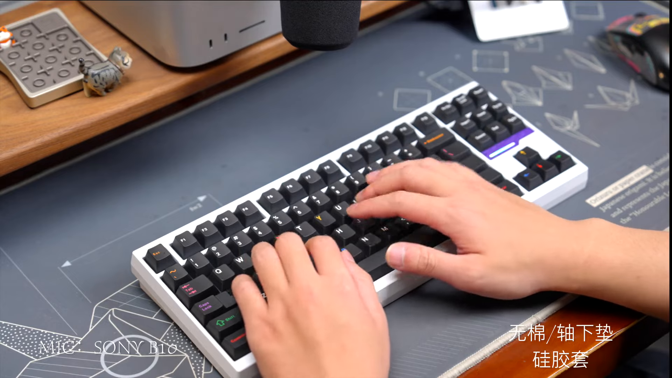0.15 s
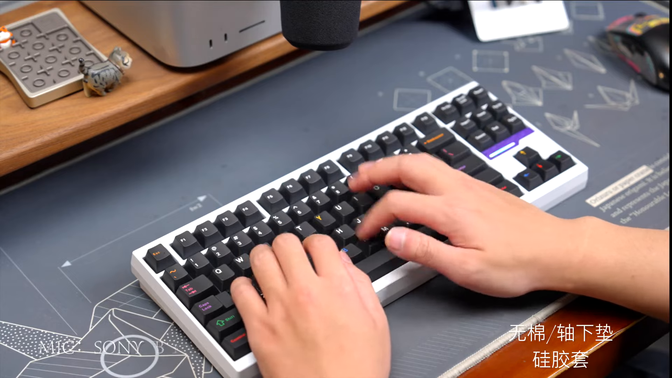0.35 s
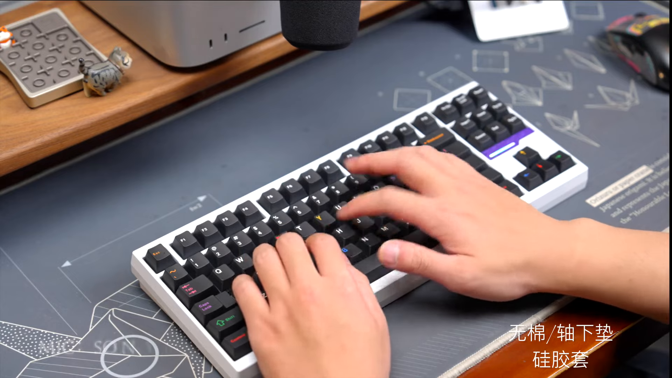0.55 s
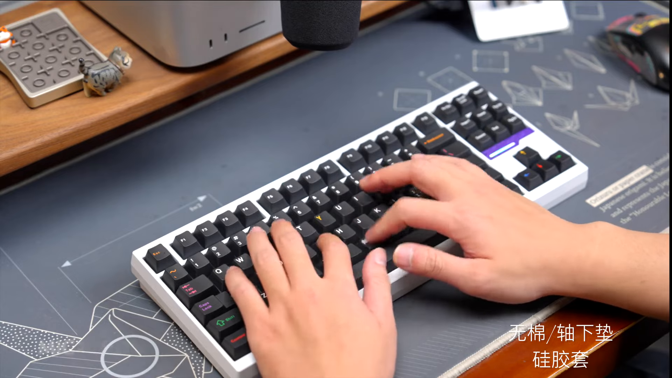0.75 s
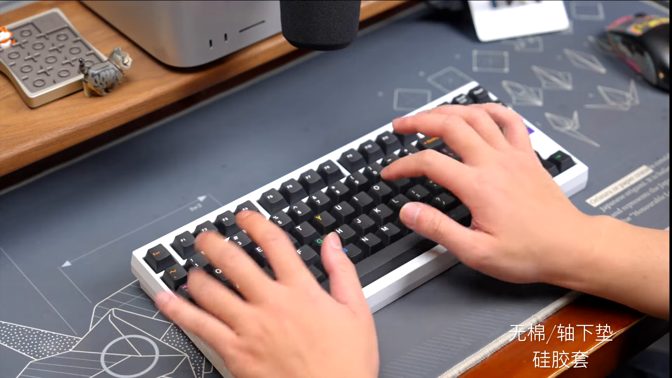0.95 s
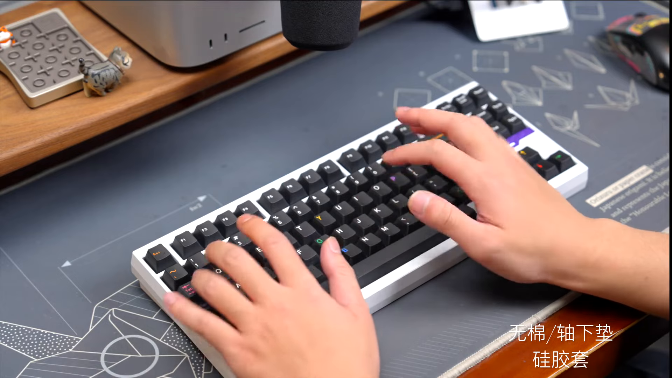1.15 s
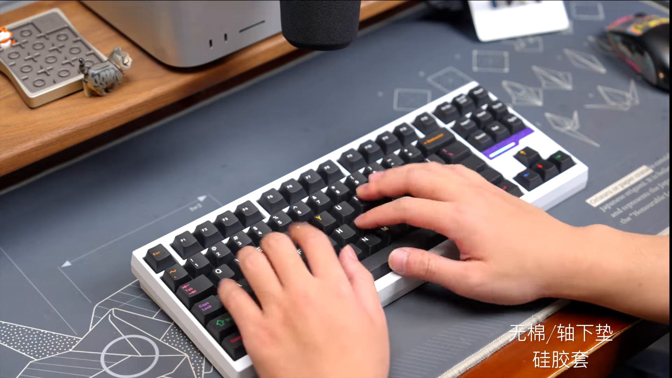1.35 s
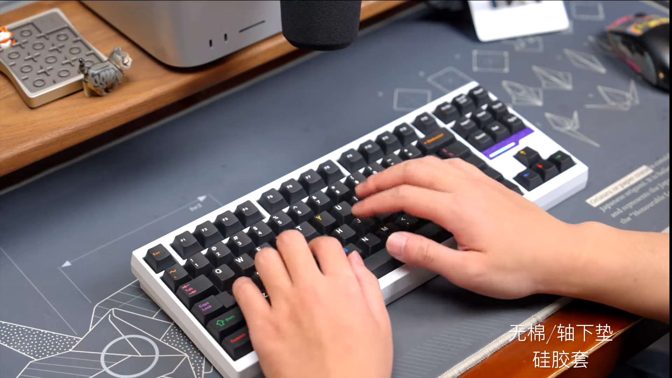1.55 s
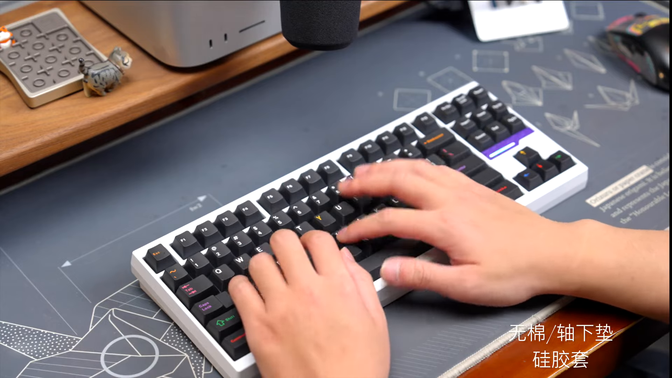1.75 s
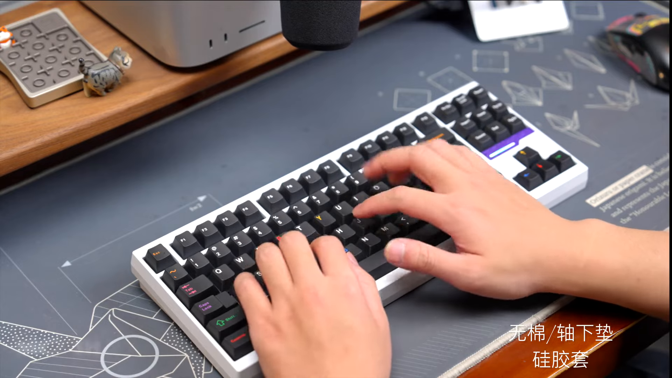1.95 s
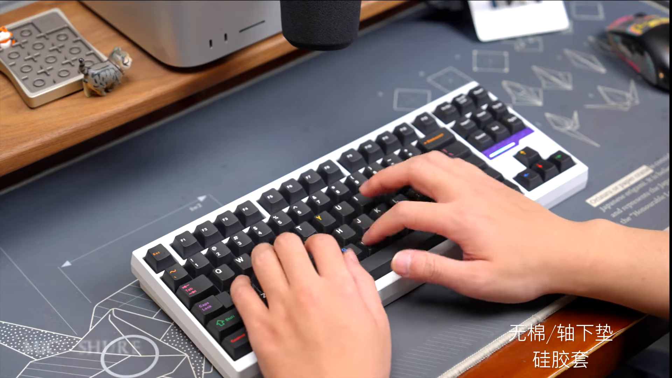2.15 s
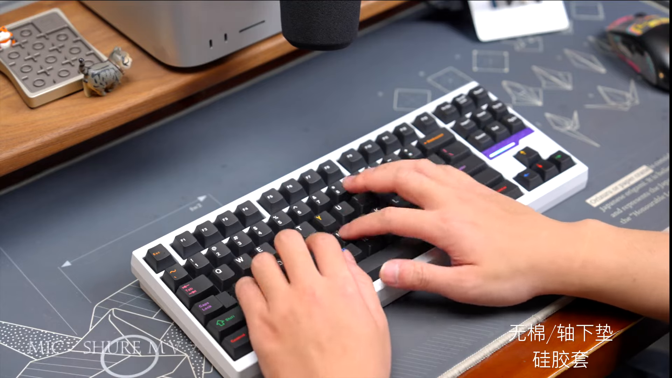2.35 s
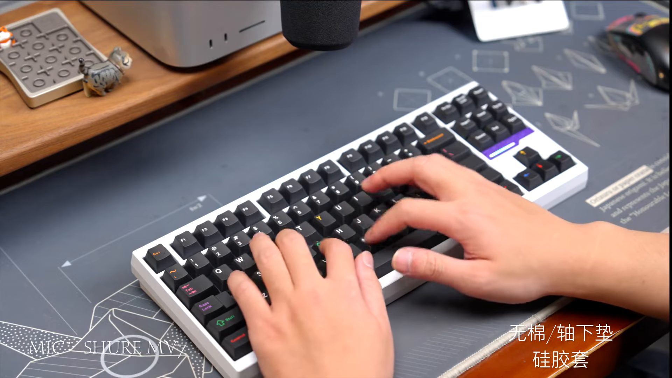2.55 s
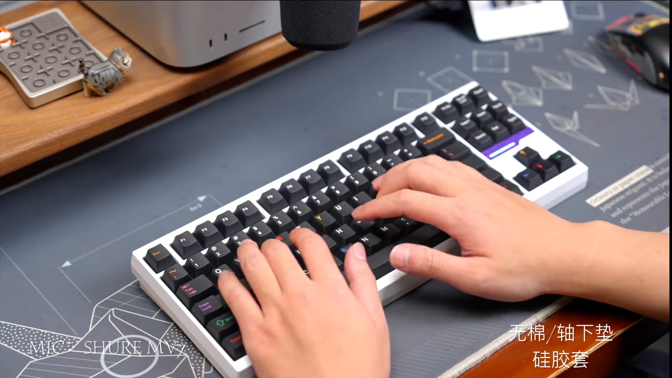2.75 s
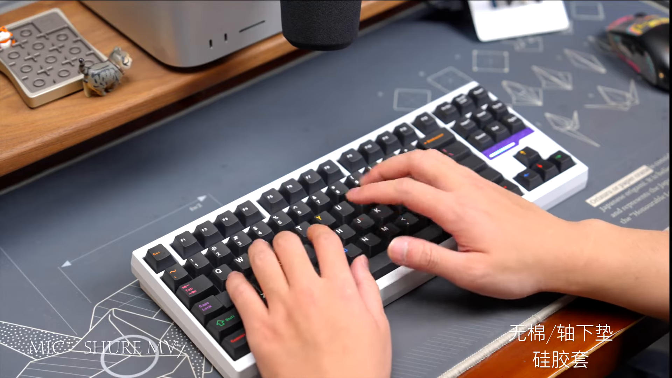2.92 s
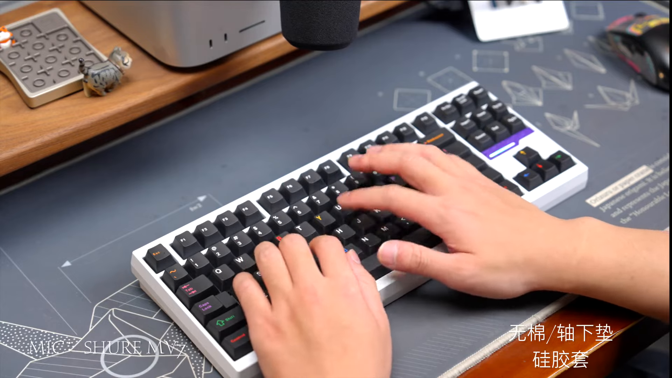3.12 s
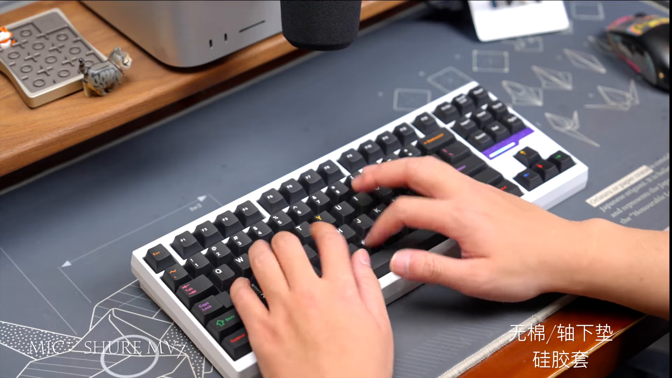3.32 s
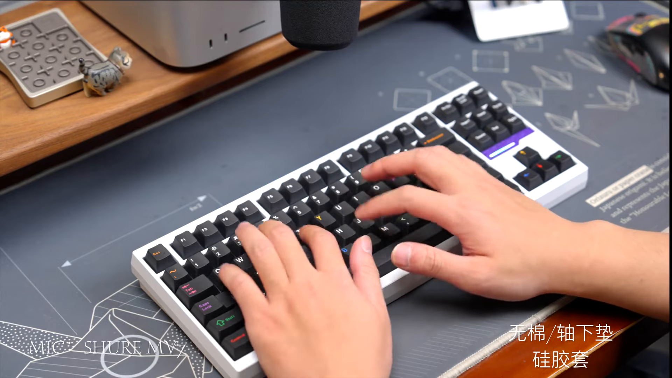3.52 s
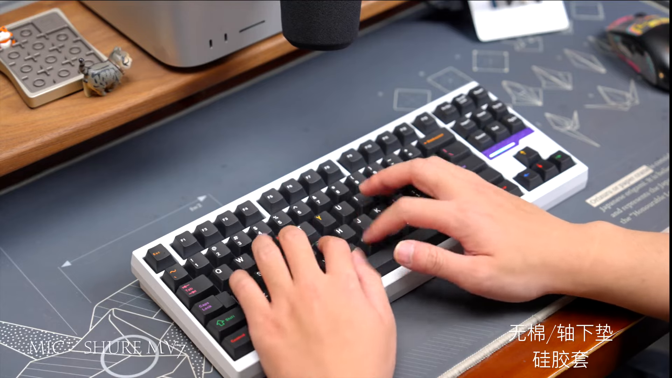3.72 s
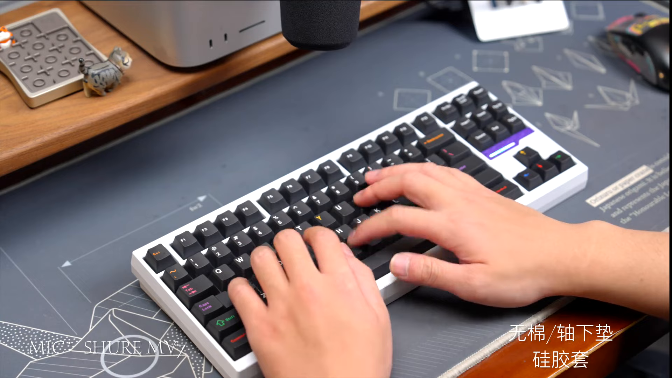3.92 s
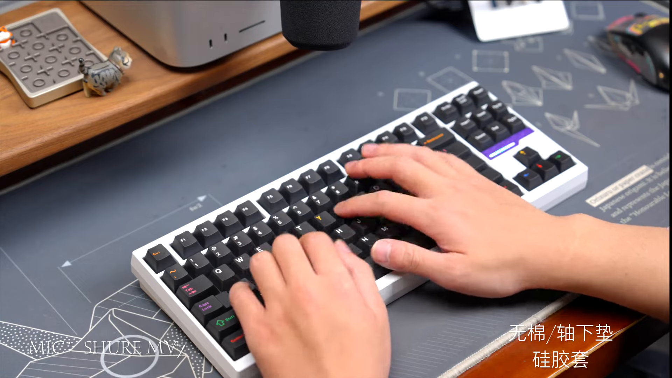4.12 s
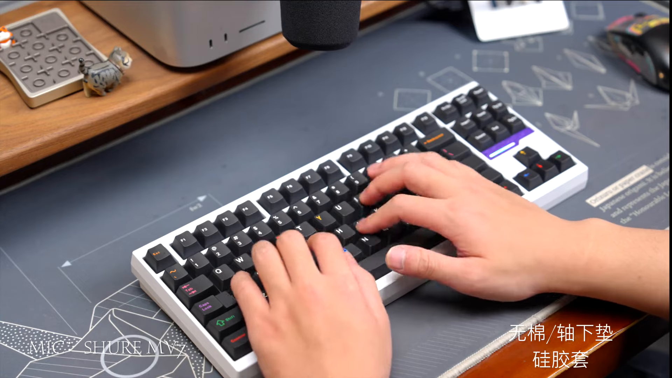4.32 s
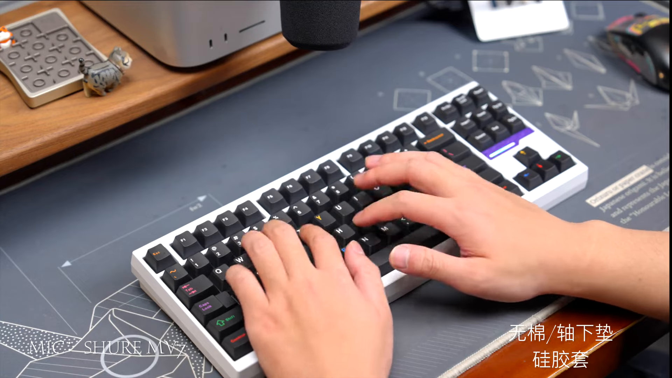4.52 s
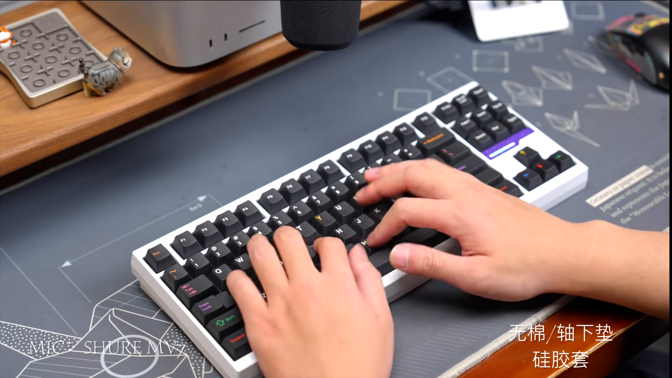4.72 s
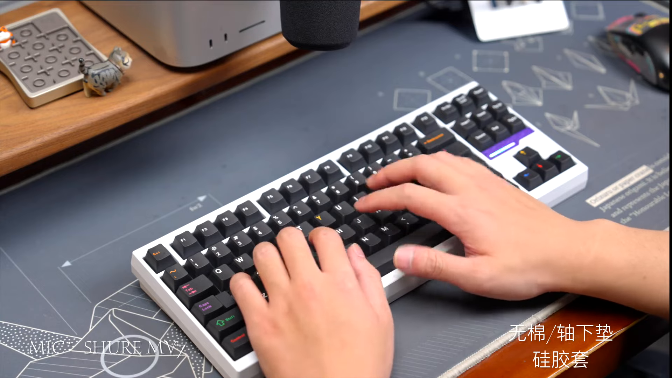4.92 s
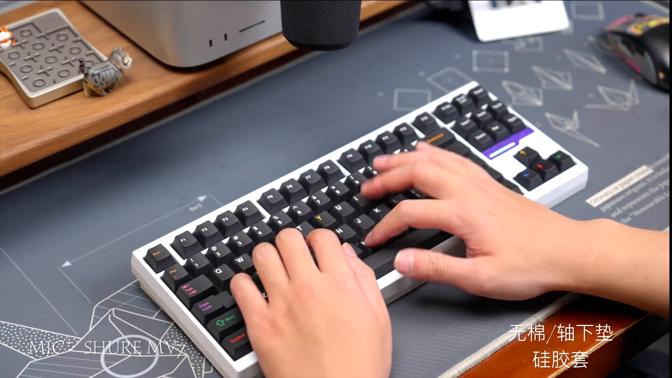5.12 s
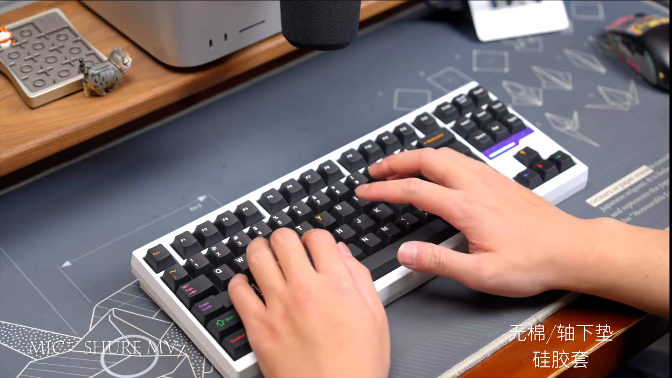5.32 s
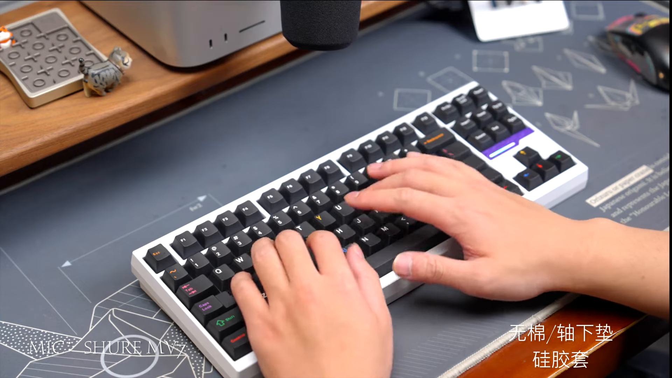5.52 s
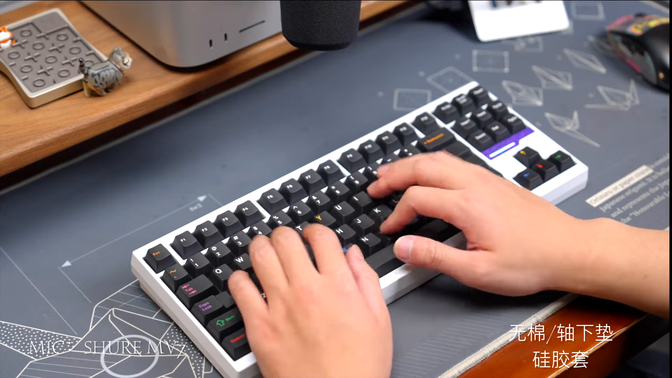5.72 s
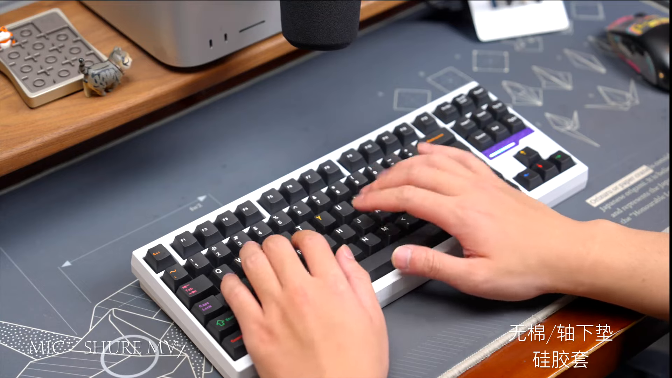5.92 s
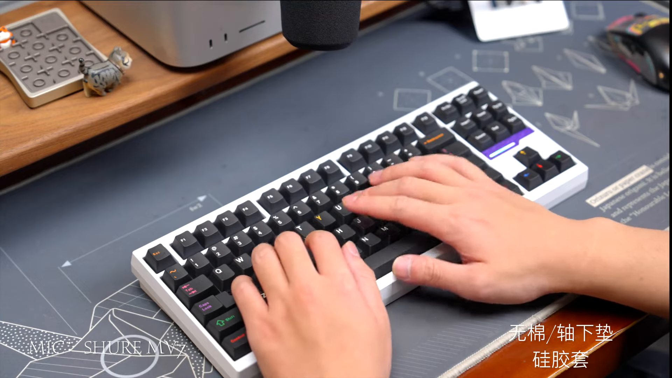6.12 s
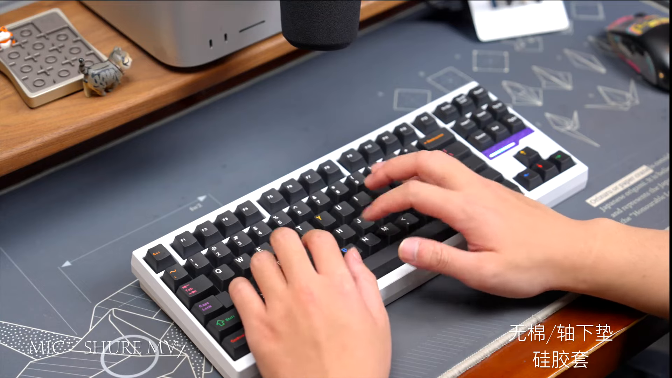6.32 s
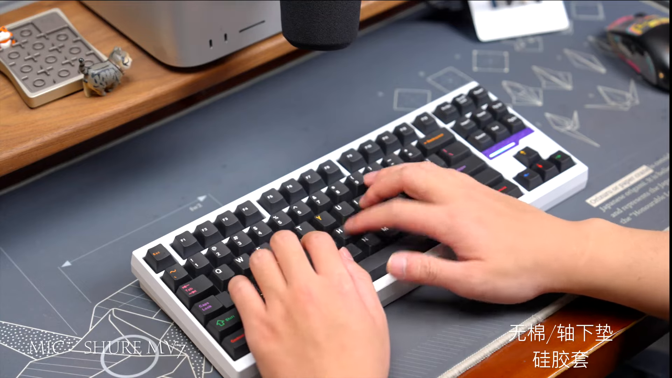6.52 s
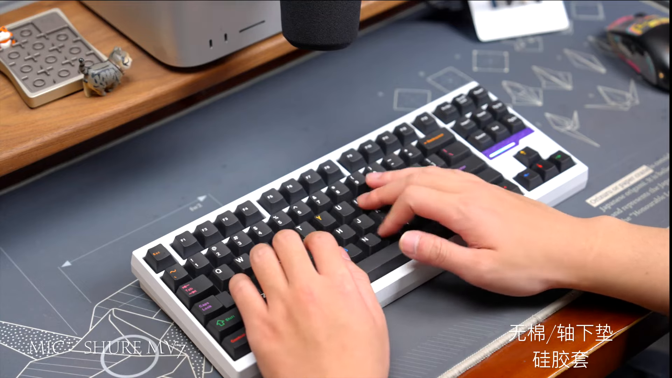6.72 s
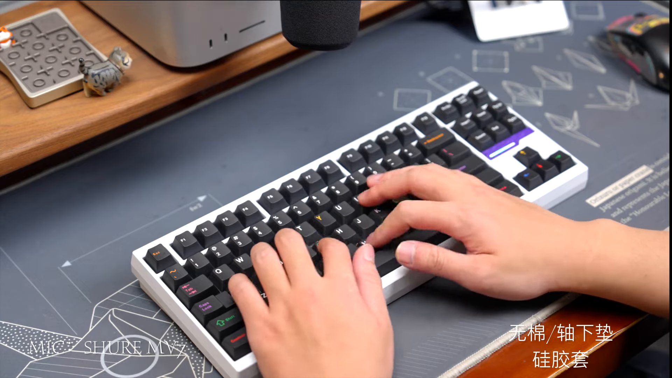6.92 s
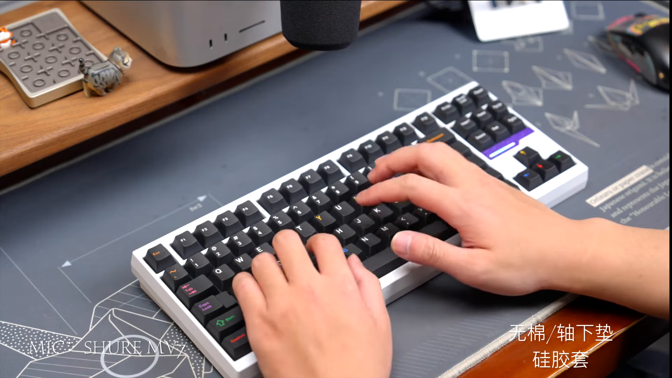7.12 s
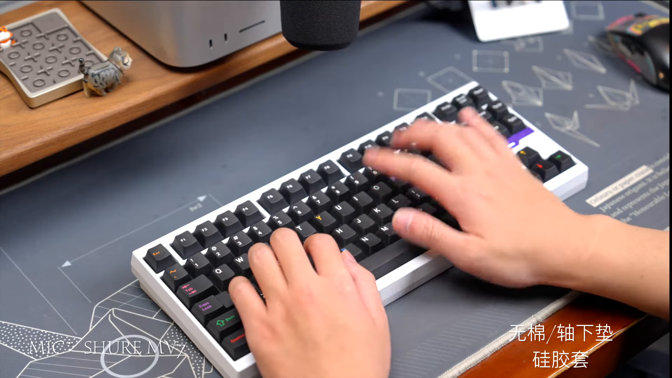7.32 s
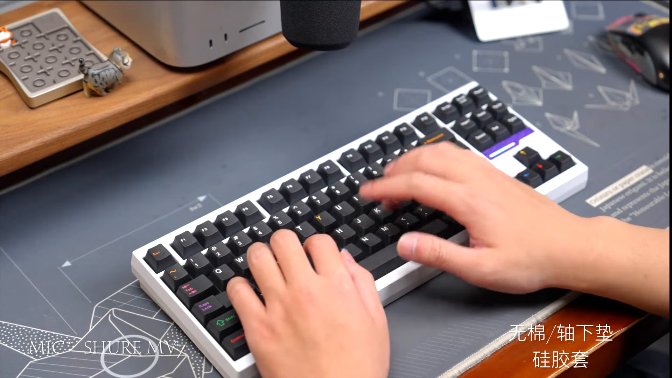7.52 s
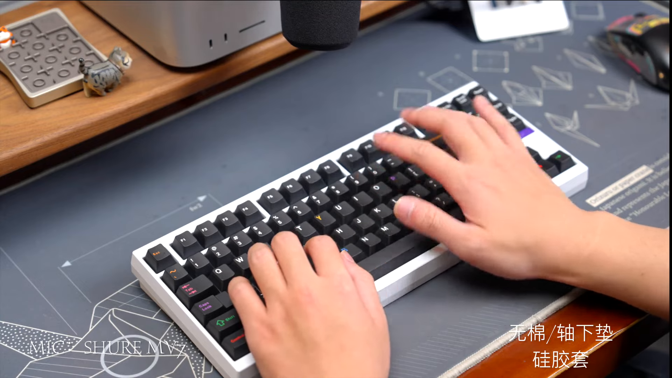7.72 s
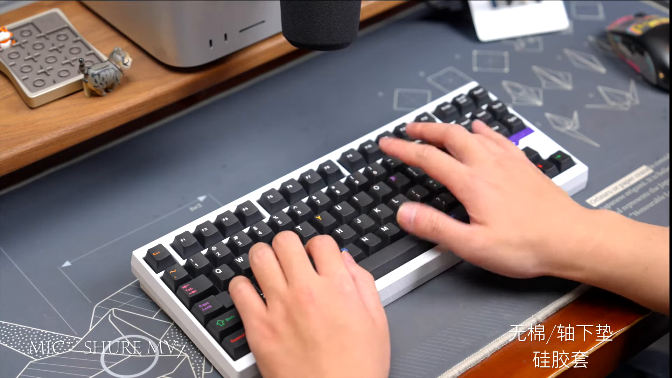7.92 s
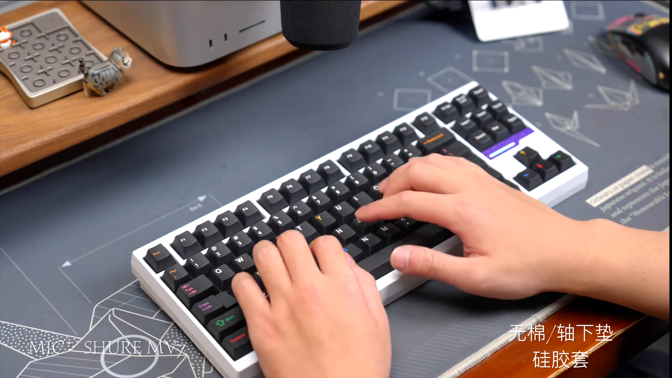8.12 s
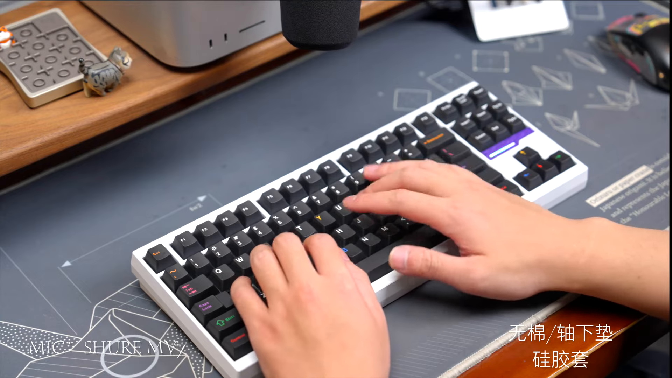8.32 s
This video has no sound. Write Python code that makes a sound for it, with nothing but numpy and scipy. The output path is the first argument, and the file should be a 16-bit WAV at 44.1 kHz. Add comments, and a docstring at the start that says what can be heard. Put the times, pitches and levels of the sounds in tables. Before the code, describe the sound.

Fast typing on a clacky mechanical keyboard in a quiet room, distant and thin first, then abruptly close, louder, fuller and drier.

```python
"""Fast typing on a foamless mechanical keyboard on a desk mat in a small quiet room.
Each key bottoms out or springs back with a short clack: decaying modes of cap, plate, case and desk.
Rattle, stem slide and finger landing surround each blow; noise tails in octave bands are the room.
A distant microphone is heard first, then the sound fades over to a close one: louder, fuller, drier.
Coloured hush, rumble, desk tones, a fan tone and one faint whistle lie behind."""
import sys
import numpy as np
from scipy import signal
from scipy.fft import rfft, irfft
from scipy.io import wavfile

SR = 44100
rng = np.random.default_rng(int(sys.argv[2]) if len(sys.argv) > 2 else 0)


def unload_wav(signal):
    """Save mono or channel-first audio to the path in sys.argv[1] as 16-bit WAV at rate SR, clipped to [-1, 1]."""
    wavfile.write(
        sys.argv[1],
        SR,
        np.round(np.clip(np.atleast_2d(signal).T, -1, 1) * 32767).astype(np.int16),
    )


N = 368676

# Letter keys bottoming out. Each row: contact in [s], clack in [dB], keycap pitch in [Hz],
# hollow re clack in [dB]. All clack levels are nominal, before the radiation cut.
PRESSES = [(-0.03, -19, 3360, -16), (0.0308, -23.5, 3430, -5), (0.3292, -14, 3340, -7.5),
           (0.4184, -21.5, 2730, -16), (0.6559, -14, 3420, -8), (0.797, -20.5, 3430, -3),
           (0.9066, -15.5, 3120, -4.5), (1.1788, -22, 2880, -8), (1.2544, -9.5, 3490, -5.5),
           (1.8612, -14, 3520, -7.5), (1.919, 0.5, 3590, -9), (1.9821, -12.5, 3050, -7.5),
           (2.0498, -9, 3400, -5), (2.197, 1, 3390, -6.5), (2.2585, -14, 2980, -37),
           (2.527, -5.5, 3290, -43), (2.749, -13.5, 3030, -25), (2.8645, -2.5, 3540, -6.5),
           (2.9293, -6.5, 3110, -15), (3.1874, 0.5, 3620, -11.5), (3.358, -0.5, 3060, -11.5),
           (3.4512, -12, 2930, -40), (3.5722, -7, 3370, -6), (3.6387, -12, 2900, -27),
           (3.7098, -12, 3300, -38), (3.782, -6, 3250, -4), (3.8678, -7, 3380, -6.5),
           (4.0982, -6, 3400, -6.5), (4.3011, 0, 3300, -7), (4.4844, -8, 3230, -40),
           (4.549, -8.5, 3480, -3.5), (4.5834, -13.5, 2940, -38), (4.683, -7, 3140, -29),
           (4.7872, -9.5, 3360, -5.5), (4.892, -10, 3500, -7), (4.9258, -14, 2730, -27),
           (5.078, -4, 3170, -4.5), (5.2201, -5.5, 3270, -5), (5.4382, -4.5, 3080, -5.5),
           (5.65, 0, 3100, -7.5), (5.9036, -7, 3310, -7.5), (6.0025, -9, 3130, -7.5),
           (6.0646, -8.5, 3400, -4), (6.1942, -6, 3140, -47), (6.3076, -3, 3050, -8),
           (6.5565, -11, 3280, -40), (6.6384, -9, 3340, -47), (6.7014, -4, 3310, -6),
           (6.9065, -5.5, 3250, -5.5), (7.1051, -4, 3090, -10), (7.2893, -14.5, 3540, -8),
           (7.5755, -6.5, 2910, -0.5), (7.7488, -4.5, 3540, -6.5), (7.973, -5, 2900, -1.5),
           (8.1012, -6.5, 2430, -36), (8.2826, 1.5, 3470, -7.5)]
# Letter keys springing back against their housing. Each row: contact in [s], clack in [dB],
# keycap pitch in [Hz], snap re clack in [dB].
RETURNS = [(0.2139, -24, 3850, -9.5), (0.4724, -25.5, 3300, -4.5), (0.5598, -32.5, 3120, -7),
           (0.7333, -29.5, 3000, -18), (0.8406, -23.5, 3320, -5), (1.963, -23, 3040, -14),
           (2.1335, -20.5, 2660, -7.5), (2.292, -19.5, 2800, -12), (2.3522, -16, 3300, -4),
           (2.4342, -20.5, 3250, -8.5), (2.4912, -26.5, 3230, -13), (2.5876, -16.5, 2830, -11),
           (2.6039, -20.5, 2730, -8.5), (2.6738, -17, 3400, -3), (2.7657, -19, 3300, -10),
           (2.8203, -20.5, 2880, -13.5), (3.2631, -19, 2900, -15), (3.5362, -16, 3360, -5.5),
           (3.832, -15.5, 3250, -4.5), (3.9842, -21.5, 3230, -14), (4.1991, -24.5, 2500, -15),
           (4.2134, -24.5, 3670, -4.5), (4.2287, -19.5, 3400, -3.5), (4.3982, -16, 2770, -9),
           (4.6152, -22.5, 2820, -12), (4.657, -24, 2740, -10), (4.844, -18, 3400, -4.5),
           (5.161, -21.5, 2600, -14), (5.2559, -13.5, 3200, -5.5), (5.3211, -18, 2800, -13.5),
           (5.5277, -18.5, 2690, -13.5), (5.5562, -20.5, 2920, -13), (6.128, -23, 2600, -16),
           (6.2617, -16.5, 2620, -14), (6.7317, -20.5, 3000, -12), (6.7894, -23, 2680, -11),
           (6.8445, -19, 3380, -6), (6.9558, -22, 3820, -4), (7.0132, -13.5, 3110, -6),
           (7.474, -20, 3500, -12), (7.487, -19, 2760, -13.5), (7.6674, -16.5, 2800, -10.5),
           (7.8322, -16.5, 2800, -6.5), (8.031, -14, 2730, -5.5), (8.1852, -16.5, 2760, -8.5)]
# Space bar and other wide keys going down. Each row: contact in [s], clack in [dB].
BAR_DOWN = [(0.1421, -19), (2.4024, -9.5), (3.062, -5), (3.9546, -7.5), (4.4168, -8.5), (4.974, -9),
            (5.7741, -6), (6.4081, -9), (7.203, -7.5)]
# Wide keys springing back. Each row: contact in [s], clack in [dB].
BAR_UP = [(1.3215, -27.5), (2.5493, -23.5), (3.1664, -25), (4.054, -25.5), (4.5163, -28.5), (6.5122, -24.5),
          (7.3561, -23.5)]
# Fingertips meeting or brushing a cap. Each row: contact in [s], clack in [dB].
TOUCHES = [(0.1244, -48), (0.2854, -37), (0.9737, -33.5), (1.544, -53), (1.6, -42), (1.6924, -43.5),
           (1.8444, -36), (1.912, -26), (2.0384, -32.5), (2.234, -33), (2.6395, -30.5), (2.694, -31),
           (2.919, -33), (2.9786, -33.5), (3.05, -29.5), (3.443, -20), (3.6576, -28), (3.6959, -34),
           (3.7693, -26), (3.8948, -28), (3.935, -20.5), (4.025, -34), (4.0452, -24.5), (4.1325, -23.5),
           (4.3325, -29), (4.7749, -23), (4.879, -28), (4.9612, -25), (4.998, -27), (5.365, -24.5),
           (5.7492, -28.5), (5.888, -29), (5.9918, -21), (6.1155, -31), (6.1776, -29), (6.3921, -24),
           (6.824, -29), (6.895, -30.5), (7.1795, -23.5), (7.23, -27), (7.4086, -34.5), (7.465, -29.5),
           (7.647, -30), (7.7415, -24.5), (8.277, -24.5)]
# Colour of these contacts. One row each: pitch in [Hz], thump, hollow and snap re clack in [dB].
BAR_DOWN_COLOUR = (2878, -31.5, -5.5, -10.5)
BAR_UP_COLOUR = (2527, -22.5, -11, -16.5)
TOUCH_COLOUR = (3018, -37.5, -7, -11.5)

# Keycap modes. Each row: multiple of the cap pitch in [1], relative level in [dB], nominal t60 in [s].
CLACK_MODES = [(1.0, 10, 0.0054), (.86, 0, 0.0093), (1.04, -3, 0.0056), (1.2, 6, 0.0014)]
# The other modes. Each row: frequency in [Hz], relative level in [dB], nominal t60 in [s].
# In turn: desk under the case, case, cavity under the plate, stem on housing, its sharp edge,
# steel stabiliser under the big keys.
THUMP_MODES = [(178, -8.5, 0.055), (426, 9, 0.0096)]
KNOCK_MODES = [(949, 16, 0.005), (1142, -10, 0.036)]
HOLLOW_MODES = [(1513, -7, 0.0055), (2153, 8.5, 0.0054), (2700, -51, .007)]
SNAP_MODES = [(4700, 4.5, 0.0029), (5410, -4, 0.0056), (6227, 1, 0.0038)]
TICK_MODES = [(7034, 4.5, 0.0018), (8820, 11.5, 0.0011), (10820, -9.5, 0.0027), (14140, -8.5, 0.0018)]
WIRE_MODES = [(4040, 0, 0.12), (5150, -5, 0.07)]

# Far, then close microphone. Each row: time in [s], room re keys in [dB at 3 kHz], room brightness
# in [dB per octave], tick re snap in [dB], hush in [dB], rumble in [dB], desk thump offset in [dB].
MICS = [(1.45, -13.5, 1.5, -1, -71, -71, -14), (1.8, -27.5, 0, -9, -64.5, -71, 6)]
# Room decay. Each row: frequency in [Hz], t60 in [s].
ROOM_T60 = [(500, 0.69), (3000, 0.42), (14000, 0.32)]
# Colour of the whole board as the walls hear it. Each row: frequency in [Hz], relative density in [dB per Hz].
ROOM_COLOUR = [(290, -51), (500, -49), (819, -26), (1690, -2), (3390, 2), (4470, -11), (5880, -10.5),
               (7800, -24), (11000, -25), (14000, -27), (16000, -33)]

# Colour of the room hush. Each row: frequency in [Hz], relative density in [dB per Hz].
HUSH_COLOUR = [(40, -20), (200, -2), (330, -7.5), (890, -15.5), (2200, -19), (9000, -28.5), (16000, -45.5)]
# Tones in the desk. Each row: frequency in [Hz], width in [Hz].
DESK_TONES = [(39, 9.0), (82, 7.1), (139, 2.7)]
# Their wavering. Each row: time in [s], rms level of each of the three tones in [dB].
DESK_TONE_LEVELS = [(0.0, -76, -84, -84), (0.18, -74, -79, -82), (0.9, -85, -67.5, -92),
                    (1.82, -80, -90, -73), (2.51, -63, -76, -73), (2.62, -83, -80, -67),
                    (3.66, -80, -68, -75), (5.85, -61.5, -71.5, -71), (6.13, -80, -84, -65.5),
                    (6.77, -81, -95, -73), (8.04, -75, -88, -67.5), (8.27, -62, -68, -66)]
# Fan tone. One row: frequency in [Hz], rms level far in [dB], rms level close in [dB].
FAN = (340, -76, -82)
# Faint thin whistle. One row: start in [s], end in [s], frequency in [Hz], rms level in [dB], width in [Hz].
WHISTLE = (1.62, 1.87, 2203, -73, 20)

# levels re clack; each microphone adds its desk thump offset to the thumps
PRESS_THUMP_DB, PRESS_SNAP_DB = -52.5, -11.5
RETURN_THUMP_DB, RETURN_HOLLOW_DB = -40, -8
FAR_SNAP_LIFT_DB = 3   # the far microphone hears more snap
KNOCK_DB_PER_THUMP_DB, KNOCK_OFFSET_DB = 0.48, 10   # the case knocks with hollow, heavy strokes
WIRE_OFFSET_DB = 6   # added to thump plus half the clack level

PITCH_SPREAD, STRENGTH_SPREAD_DB = .025, 2.5   # keys differ with their place on the plate
TOUCH_PITCH_SPREAD = .08   # touches fall on any cap
WIRE_PITCH_SPREAD = .004   # always the same wire
RING_DB_PER_THUMP_DB, PLAIN_THUMP_DB = 0.21, -49   # ringing lengthens with thump above a plain key's
CONTACT_S = .0003   # rise of the blow
RADIATION_HZ = 1004   # parts smaller than the wavelength radiate little below this

BLOW_SAMPLES = 2600   # length of one blow, also the run-in
OPENING_SAMPLES = 40   # start of the blow that rattle and slide repeat
RATTLE_DB, RATTLE_T60_S = -33.5, 0.032   # nominal t60, stretched with the ringing
SLIDE_DB, SLIDE_S = -49.5, 0.0075
LANDING_DB, LANDING_SPREAD_DB, LANDING_S = -34, 5, .008   # re blow; time ahead of it

PLACES = 6   # spots on the board, each with its own echo pattern
FIRST_ECHO_S = 0.00067   # build-up of the tail
OWN_COLOUR_DB = 1.5   # share of the tail that keeps the colour of the single key
NOTCH_HZ, NOTCH_WIDTH_HZ = 6850, 400   # desk reflection cancels here
RUMBLE_BAND_HZ, RUMBLE_SWING_DB = (35, 220), 2.0
LOW_CUT_HZ, CUTOFF_HZ = 30, 16650


def keys():
    """Blows with rattle, slide and landing, and the kick each sends to the walls; both start one run-in early."""
    columns = contacts()
    start_s = columns[0]
    blows, longer = blow(*columns)
    hits = blows + rattle(blows, longer)
    approaches = approach(blows)
    typing = np.zeros((2 * PLACES, N + 3 * BLOW_SAMPLES))
    kicks = np.zeros((2 * PLACES, N + BLOW_SAMPLES))
    starts = np.round(start_s * SR).astype(int) + BLOW_SAMPLES
    close = start_s > MICS[0][0]
    rows = (PLACES * (rng.random(len(start_s)) + close)).astype(int)   # far places first, then close ones
    for row, at, lead, hit in zip(rows, starts, approaches, hits):
        typing[row, at:at + 2 * BLOW_SAMPLES] += np.concatenate([lead, hit])
    kicks[rows, starts] = np.linalg.norm(blows, axis=1)   # root energy of the blow
    return typing[:, BLOW_SAMPLES:2 * BLOW_SAMPLES + N], kicks


def contacts():
    """All contacts as columns: start s, clack dB, pitch Hz, thump, hollow and snap dB."""
    rows = [(s, db, hz, PRESS_THUMP_DB, hollow_db, PRESS_SNAP_DB) for s, db, hz, hollow_db in PRESSES]
    rows += [(s, db, hz, RETURN_THUMP_DB, RETURN_HOLLOW_DB, snap_db) for s, db, hz, snap_db in RETURNS]
    rows += [(*row, *BAR_DOWN_COLOUR) for row in BAR_DOWN]
    rows += [(*row, *BAR_UP_COLOUR) for row in BAR_UP]
    touches = np.array([(*row, *TOUCH_COLOUR) for row in TOUCHES])
    touches[:, 2] *= 1 + TOUCH_PITCH_SPREAD * rng.standard_normal(len(touches))
    return np.vstack([rows, touches]).T


def blow(start_s, clack_db, cap_hz, thump_db, hollow_db, snap_db):
    """Each contact rings cap, wire, case, cavity and stem, which radiate only treble, and thumps the desk."""
    t = np.arange(BLOW_SAMPLES) / SR
    mics = np.transpose(MICS)
    snap_db = snap_db + FAR_SNAP_LIFT_DB * (start_s < mics[0, 0])
    tick_db = snap_db + np.interp(start_s, mics[0], mics[3])
    desk_db = thump_db + np.interp(start_s, mics[0], mics[6])
    knock_db = hollow_db + KNOCK_DB_PER_THUMP_DB * thump_db + KNOCK_OFFSET_DB
    wire_db = WIRE_OFFSET_DB + thump_db + .5 * clack_db
    longer = from_db(RING_DB_PER_THUMP_DB * (thump_db - PLAIN_THUMP_DB))   # thumpy keys ring longer
    plain = np.ones_like(longer)
    blows = struck(CLACK_MODES, t, longer, cap_hz[:, None])
    blows += from_db(wire_db)[:, None] * struck(WIRE_MODES, t, plain, spread=WIRE_PITCH_SPREAD)
    parts = ((KNOCK_MODES, knock_db), (HOLLOW_MODES, hollow_db), (SNAP_MODES, snap_db), (TICK_MODES, tick_db))
    for modes, share_db in parts:
        blows = blows + from_db(share_db)[:, None] * struck(modes, t, longer)
    blows = signal.sosfilt(signal.butter(4, RADIATION_HZ, "high", fs=SR, output="sos"), blows)
    blows += from_db(desk_db)[:, None] * struck(THUMP_MODES, t, plain)
    return blows * from_db(clack_db)[:, None], longer


def struck(modes, t, longer, scale=1, spread=PITCH_SPREAD):
    """Decaying sines, peak 1 per contact; modes shift a little in pitch and strength from one to the next."""
    hz, level_db, t60_s = np.transpose(modes)
    draws = rng.standard_normal((len(longer), 2 * len(modes)))
    hz = hz * scale * (1 + spread * draws[:, ::2])
    gains = from_db(level_db + STRENGTH_SPREAD_DB * draws[:, 1::2])
    decay = from_db(-60 * t / (t60_s * longer[:, None])[..., None])
    sines = np.sin(2 * np.pi * hz[..., None] * t)
    rings = np.sum(gains[..., None] * decay * sines, axis=1)
    rings *= 1 - np.exp(-(t / CONTACT_S) ** 2)
    return rings / np.abs(rings).max(axis=1, keepdims=True)


def rattle(blows, longer):
    """Loose cap and wire chatter: the blow's opening repeated by a dying swarm of tiny contacts."""
    t = np.arange(BLOW_SAMPLES) / SR
    fade_db = RATTLE_DB - 60 * t / (RATTLE_T60_S * longer[:, None])
    swarm = rng.standard_normal(blows.shape) * from_db(fade_db)
    return signal.fftconvolve(blows[:, :OPENING_SAMPLES], swarm, axes=1)[:, :BLOW_SAMPLES]


def approach(blows):
    """Stem scraping down its rails, swelling up to the blow, and the finger landing on the cap just before."""
    before_s = np.arange(BLOW_SAMPLES)[::-1] / SR
    scrape = rng.standard_normal(blows.shape)
    slide = signal.fftconvolve(blows[:, :OPENING_SAMPLES], scrape, axes=1)[:, :BLOW_SAMPLES]
    slide *= from_db(SLIDE_DB) * np.exp(-(before_s / SLIDE_S) ** 2)
    early = round(LANDING_S * SR)
    landing_db = LANDING_DB + LANDING_SPREAD_DB * rng.standard_normal((len(blows), 1))
    slide[:, -early:] += blows[:, :early] * from_db(landing_db)
    return slide


def room(typing, kicks):
    """Diffuse tail per microphone and place: octave bands of noise, each dying at its own rate."""
    t, out = np.arange(SR // 2) / SR, 0
    for row, fed in enumerate(zip(kicks, typing)):
        wet_db, tilt_db = MICS[row // PLACES][1:3]
        # kicks excite the board's mean colour, the typing itself keeps each key's own
        board = coloured(ROOM_COLOUR, len(t))
        own = from_db(OWN_COLOUR_DB) * rng.standard_normal(len(t))
        noises = np.array([board, own]) * (1 - np.exp(-(t / FIRST_ECHO_S) ** 2))
        tails = 0
        for k, low_hz in enumerate(250 * 2.0 ** np.arange(7)):
            hz = low_hz * np.sqrt(2)
            t60_s = at_hz(ROOM_T60, hz)
            edges_hz = [low_hz, min(2 * low_hz, SR // 2 - 1000)]
            bands = signal.sosfilt(signal.butter(2, edges_hz, "band", fs=SR, output="sos"), noises)
            bands *= from_db(-60 * t / t60_s) * np.sqrt(np.log(1e6) / (t60_s * SR))   # same energy for any decay
            tails = tails + (-1) ** k * from_db(wet_db + tilt_db * np.log2(hz / 3000)) * bands
        out = out + signal.oaconvolve(np.array(fed), tails, axes=1).sum(axis=0)[:kicks.shape[1]]
    return out


def hush():
    """Steady room noise of one colour; its level follows the microphone."""
    return from_db(in_time(MICS)[3]) * coloured(HUSH_COLOUR, N)


def rumble():
    """Desk and building rumble: band noise swelling slowly at random."""
    band = signal.butter(2, RUMBLE_BAND_HZ, "band", fs=SR, output="sos")
    noise = signal.sosfilt(band, rng.standard_normal(N))
    swing = np.interp(np.arange(N) / SR, np.arange(30) / 3, rng.standard_normal(30))   # three points a second
    return from_db(in_time(MICS)[4] + RUMBLE_SWING_DB * swing) * rms_one(noise)


def desk_tones():
    """Wavering low tones in the desk, each noise through one resonance."""
    levels_db = in_time(DESK_TONE_LEVELS)
    return sum(from_db(db) * narrow_noise(*tone) for tone, db in zip(DESK_TONES, levels_db))


def fan():
    """Pure fan tone, its level fading from the far to the close microphone."""
    now = np.arange(N) / SR
    hz, far_db, close_db = FAN
    level_db = np.interp(now, np.array(MICS)[:, 0], [far_db, close_db])
    return from_db(level_db) * np.sqrt(2) * np.sin(2 * np.pi * hz * now)


def whistle():
    """Faint thin whistle: narrow noise that rises in 30 ms, holds and stops."""
    start, end, hz, level_db, width_hz = WHISTLE
    swell = np.interp(np.arange(N) / SR, [start - .03, start, end], [0, 1, 1], right=0)
    return from_db(level_db) * swell * narrow_noise(hz, width_hz)


def from_db(db):
    """Decibels to gain."""
    return 10 ** (np.asarray(db) / 20)


def rms_one(x):
    """Scale to rms 1."""
    return x / np.sqrt(np.mean(x ** 2) + 1e-20)


def in_time(rows):
    """Columns of a table after its time column, one value per sample."""
    s, *columns = np.transpose(rows)
    return [np.interp(np.arange(N) / SR, s, c) for c in columns]


def at_hz(points, hz):
    """Read a spectrum table on a log-frequency axis."""
    table_hz, values = np.transpose(points)
    return np.interp(np.log(hz), np.log(table_hz), values)


def narrow_noise(hz, width_hz):
    """Noise through one resonance, rms 1."""
    r = np.exp(-np.pi * width_hz / SR)
    poles = [1, -2 * r * np.cos(2 * np.pi * hz / SR), r * r]
    return rms_one(signal.lfilter([1], poles, rng.standard_normal(N)))


def coloured(spectrum, size):
    """Noise with a given spectrum, rms 1."""
    hz = np.maximum(np.fft.rfftfreq(size, 1 / SR), 1)
    shaped = rfft(rng.standard_normal(size)) * from_db(at_hz(spectrum, hz))
    return rms_one(irfft(shaped, size))


def scene():
    """Keys and their room through the desk notch, over the background."""
    typing, kicks = keys()
    sound = typing.sum(axis=0) + room(typing, kicks)
    sound = signal.lfilter(*signal.iirnotch(NOTCH_HZ, NOTCH_HZ / NOTCH_WIDTH_HZ, SR), sound)
    background = hush() + desk_tones() + rumble() + fan() + whistle()
    return (sound[BLOW_SAMPLES:] + background)[None]


def record(dry):
    """The deepest bass is cut, peaks beyond full scale clip, the top is cut."""
    dry = signal.sosfilt(signal.butter(4, LOW_CUT_HZ, "high", fs=SR, output="sos"), dry)
    top_cut = signal.cheby2(16, 60, CUTOFF_HZ, fs=SR, output="sos")
    return signal.sosfilt(top_cut, np.clip(dry, -1, 1))


dry = scene()
out = record(dry)
unload_wav(out)
```